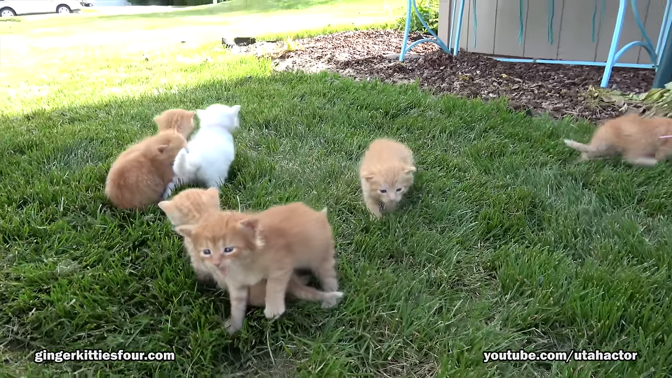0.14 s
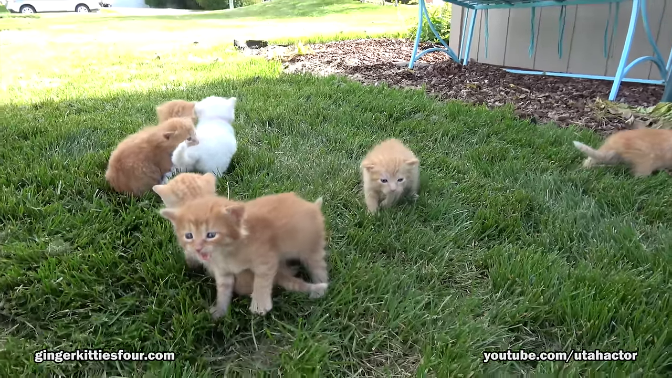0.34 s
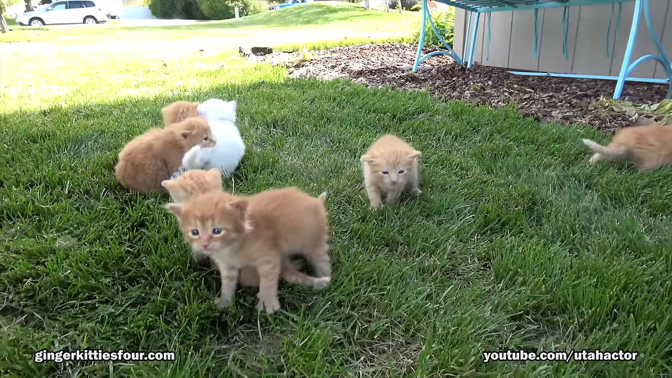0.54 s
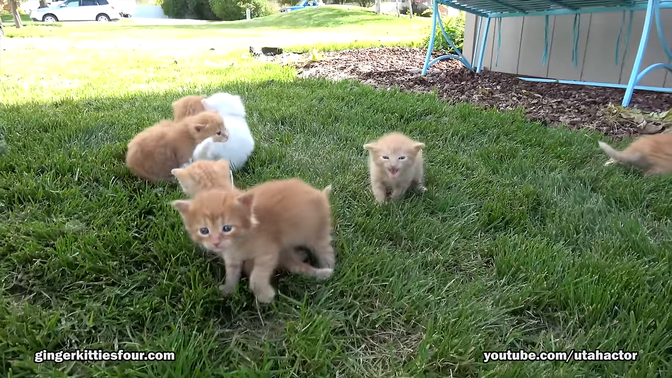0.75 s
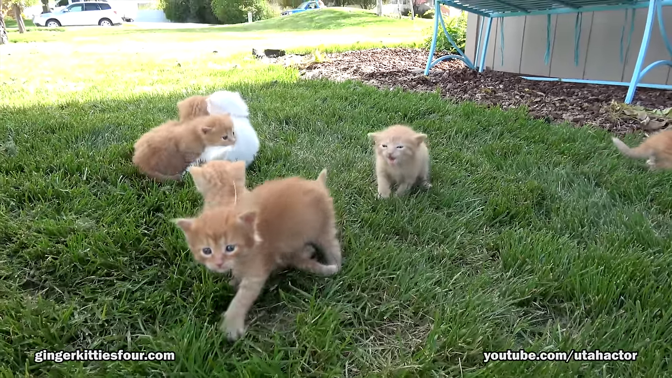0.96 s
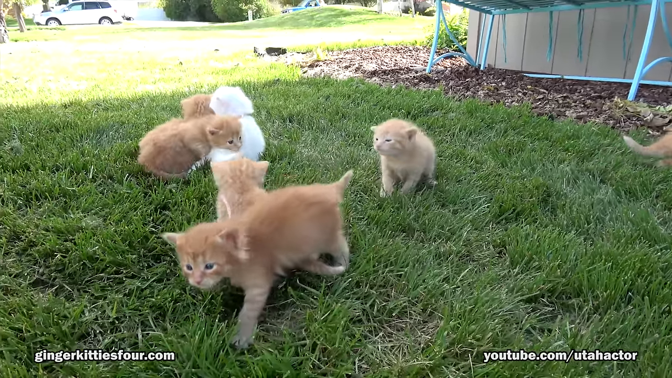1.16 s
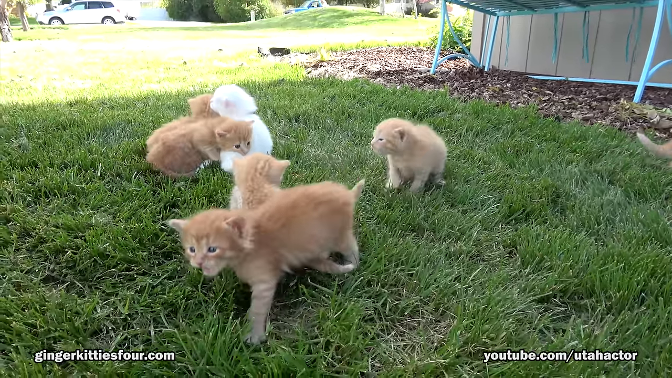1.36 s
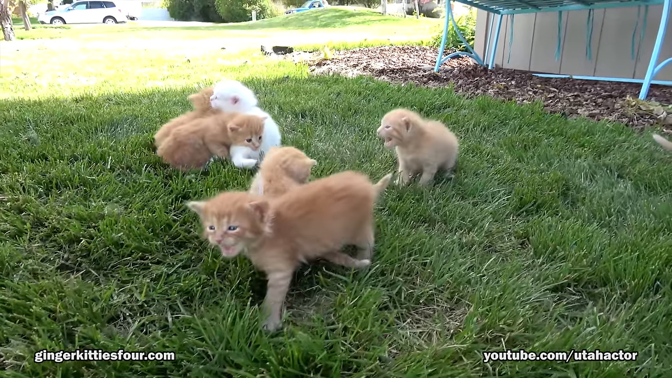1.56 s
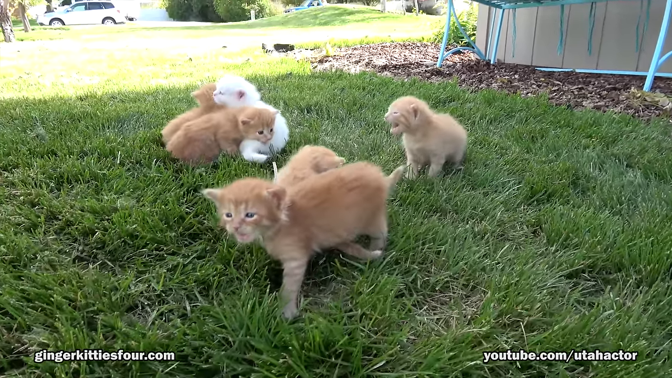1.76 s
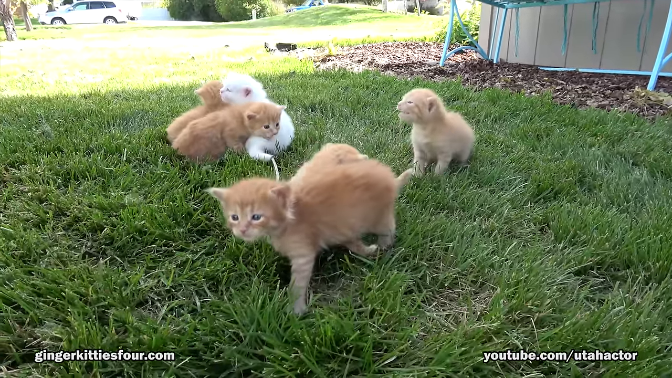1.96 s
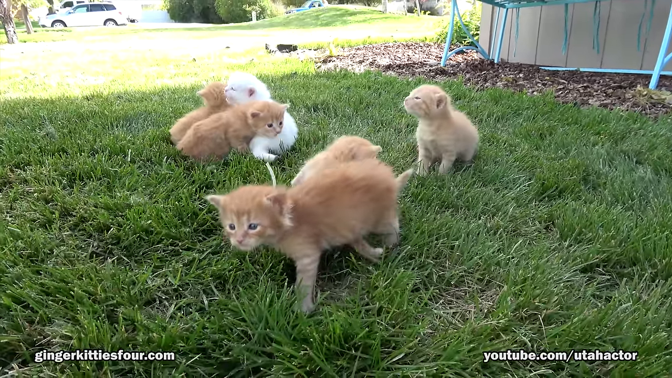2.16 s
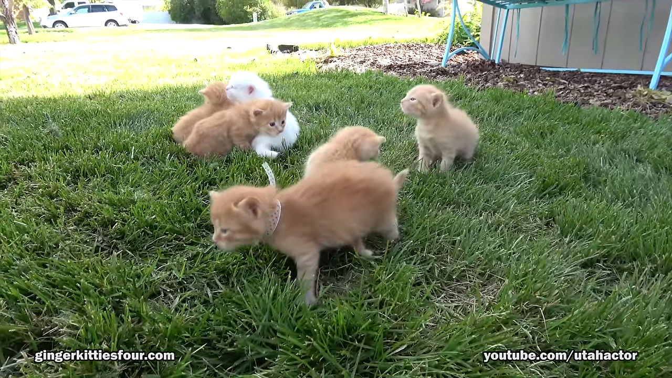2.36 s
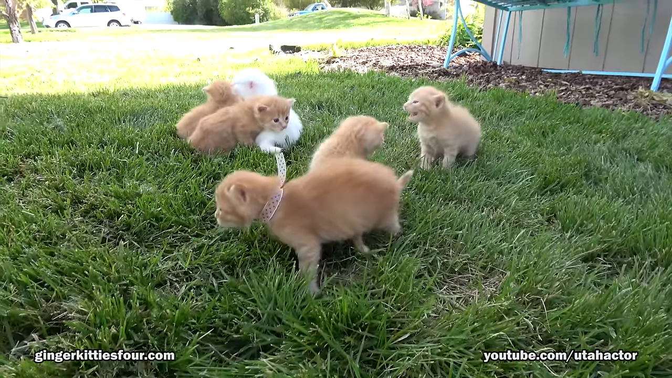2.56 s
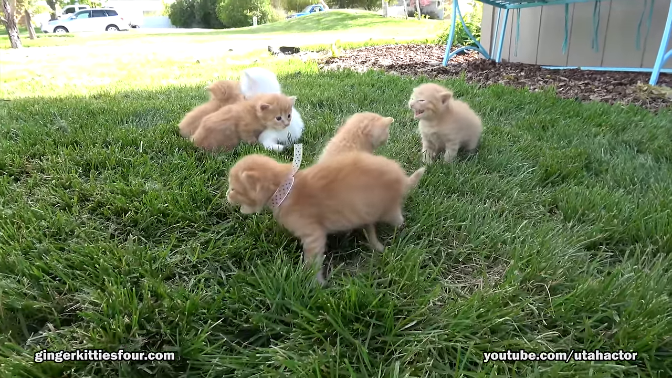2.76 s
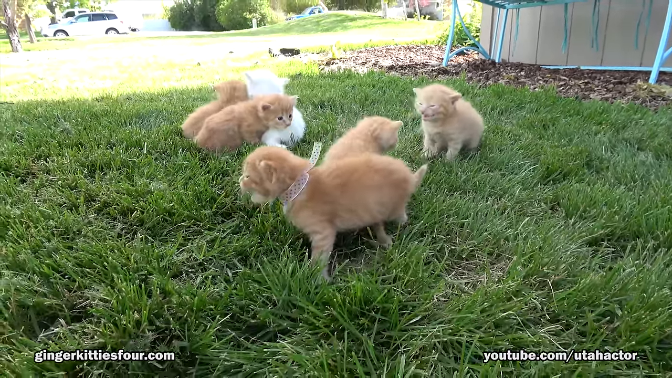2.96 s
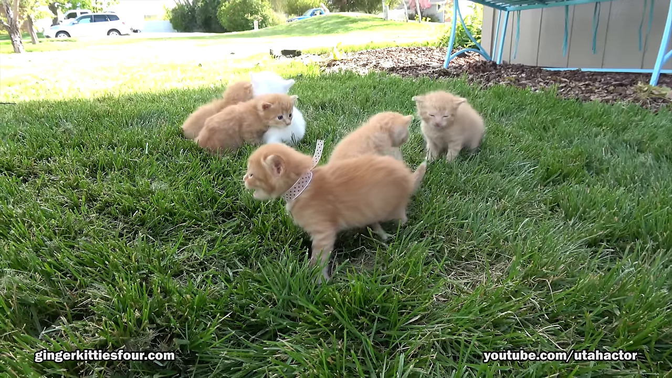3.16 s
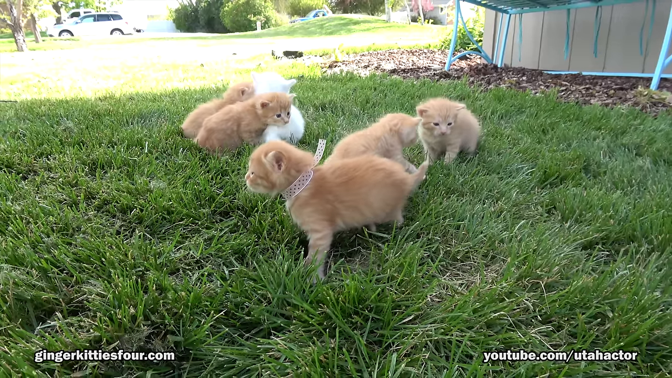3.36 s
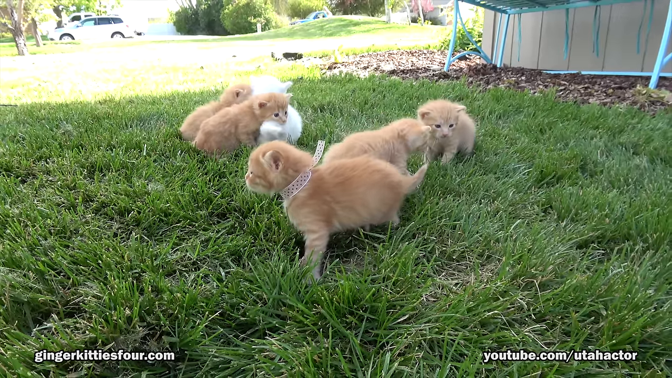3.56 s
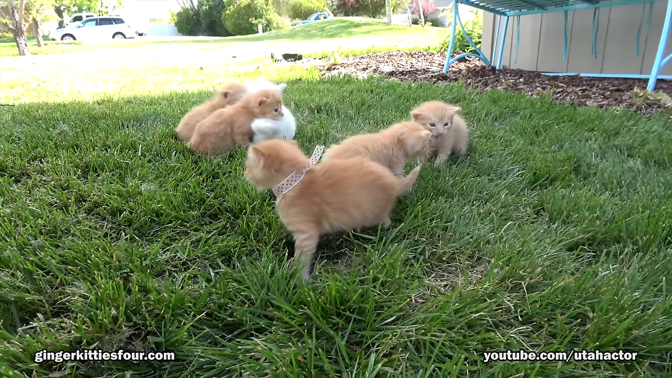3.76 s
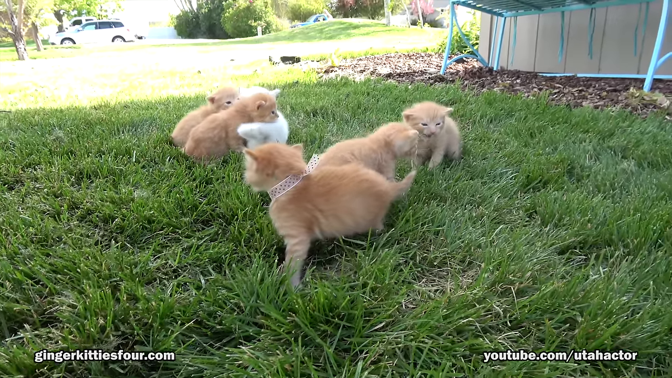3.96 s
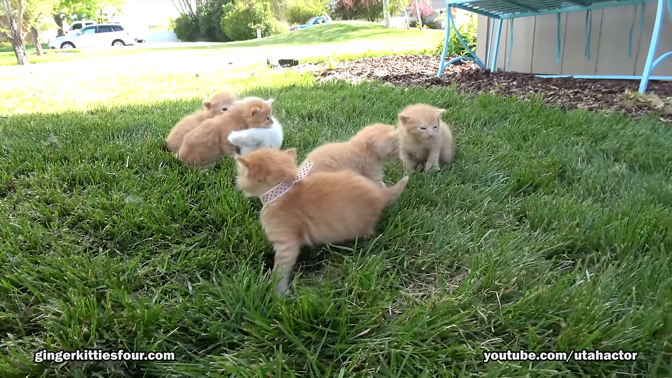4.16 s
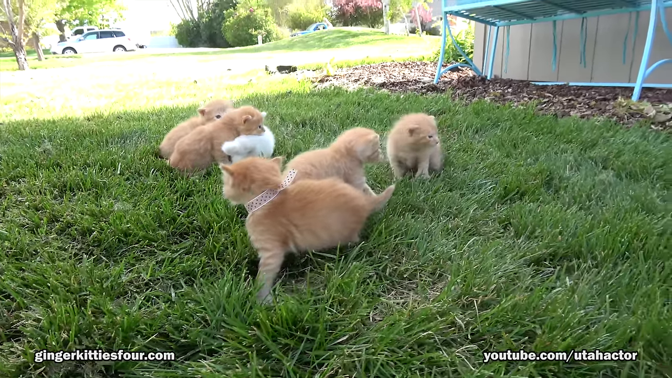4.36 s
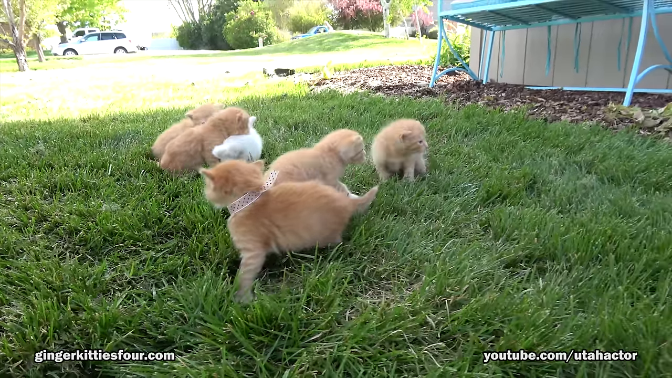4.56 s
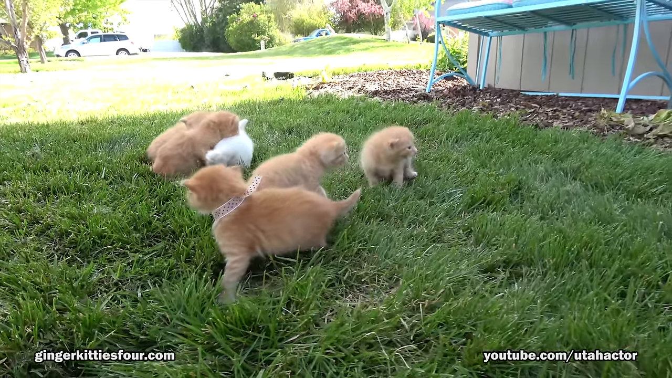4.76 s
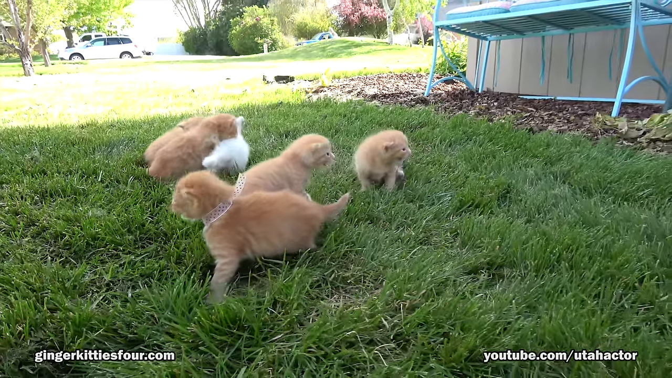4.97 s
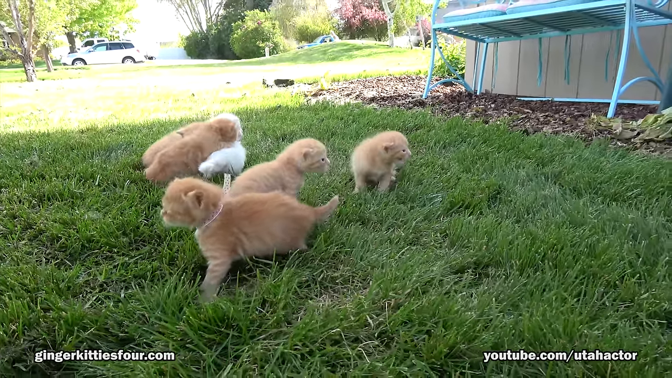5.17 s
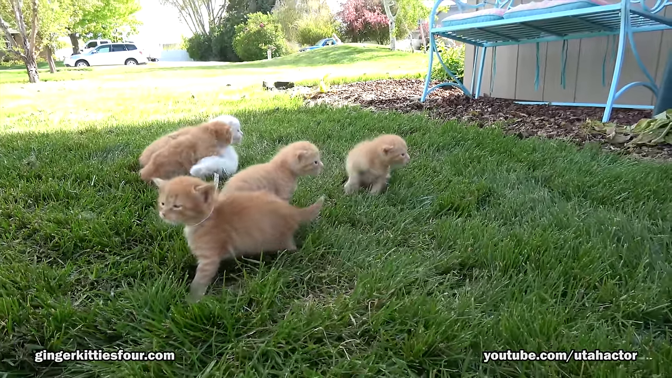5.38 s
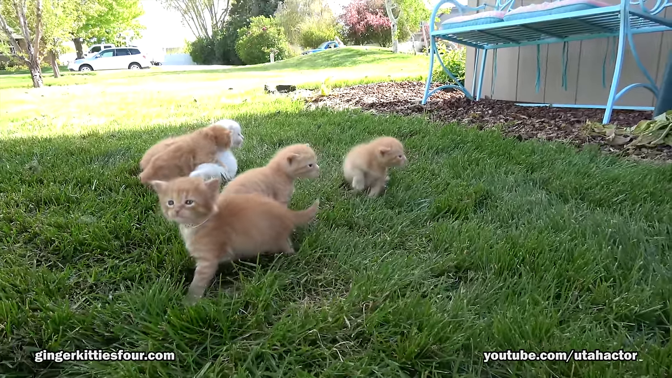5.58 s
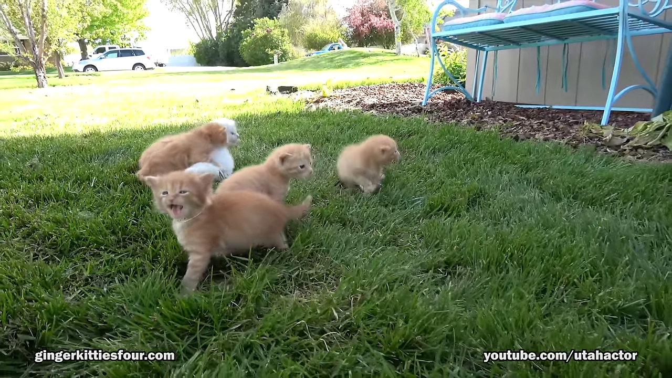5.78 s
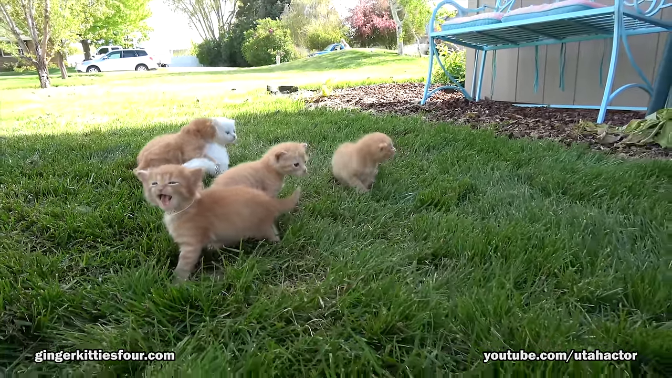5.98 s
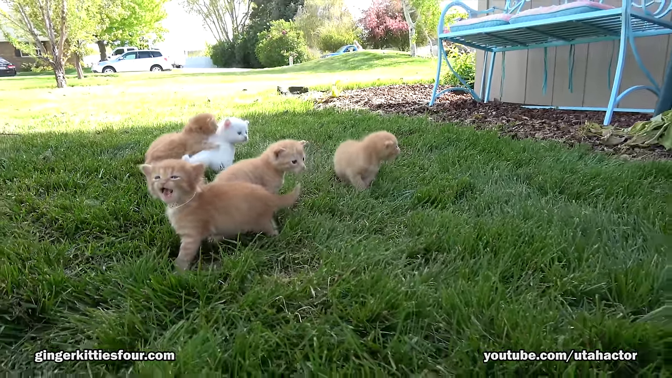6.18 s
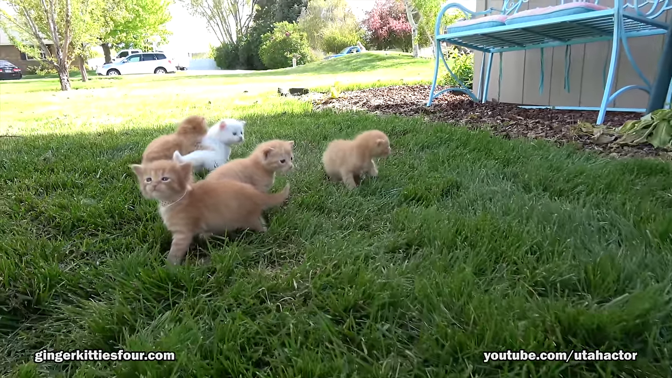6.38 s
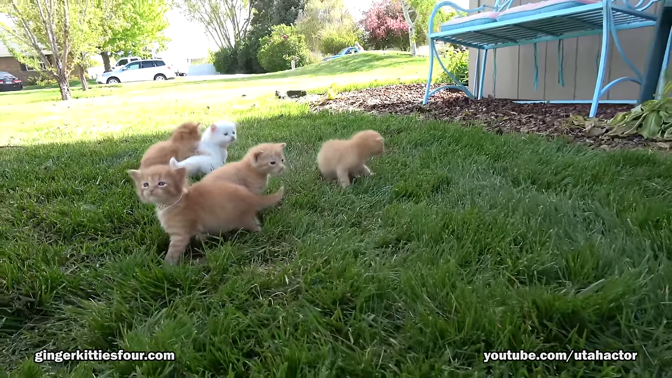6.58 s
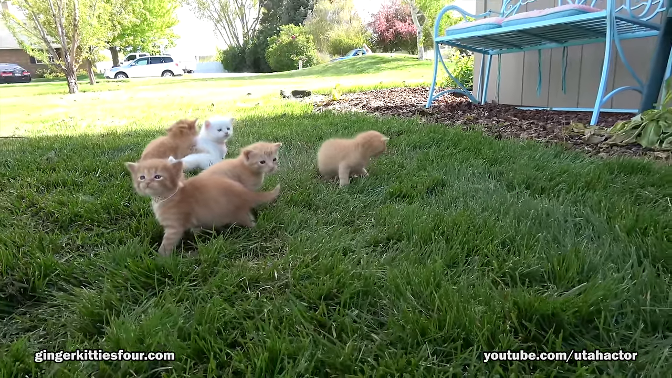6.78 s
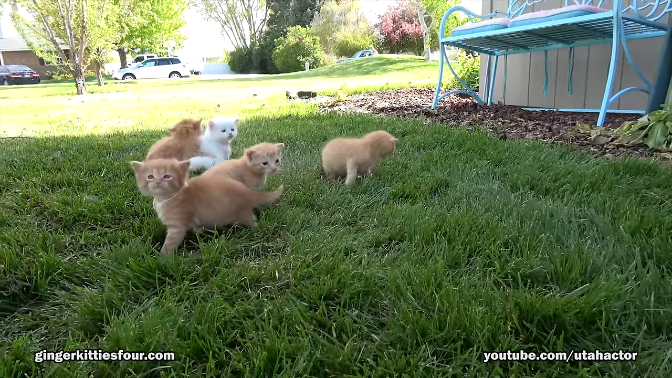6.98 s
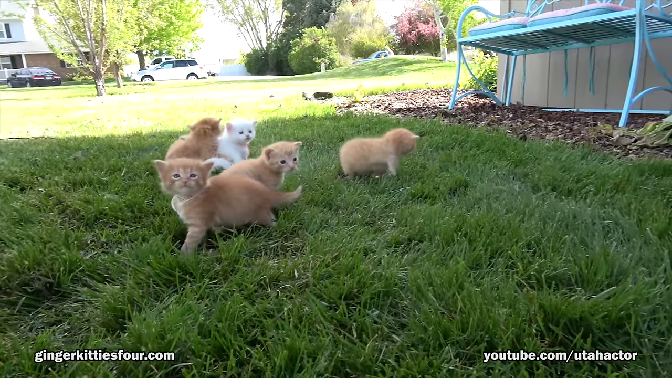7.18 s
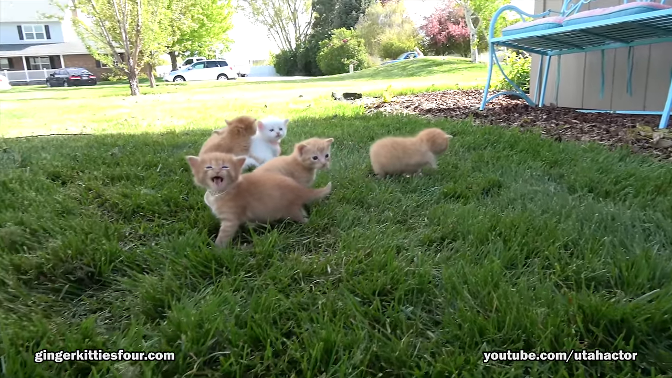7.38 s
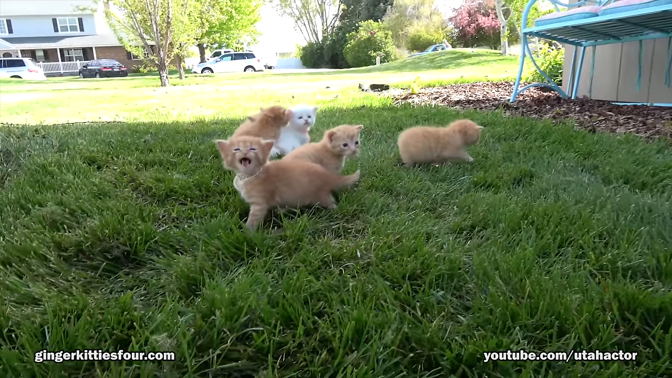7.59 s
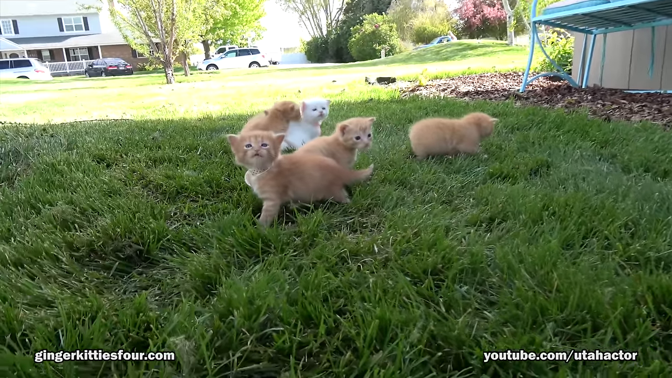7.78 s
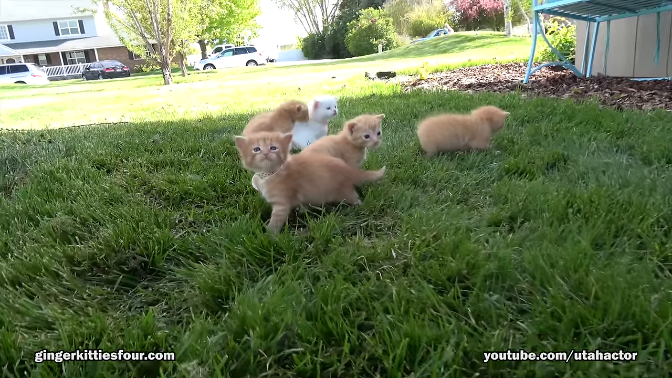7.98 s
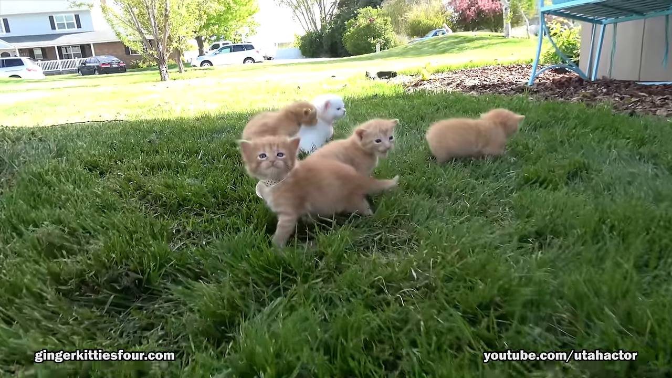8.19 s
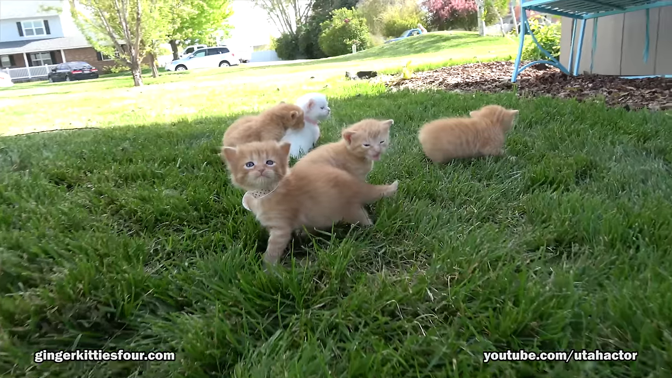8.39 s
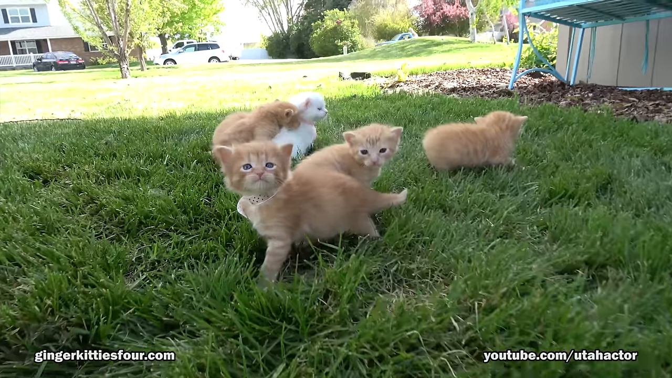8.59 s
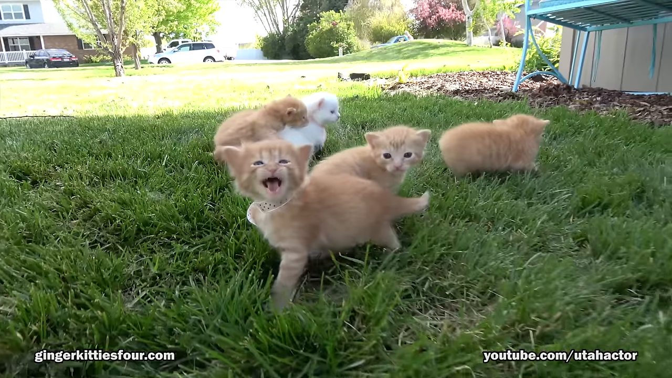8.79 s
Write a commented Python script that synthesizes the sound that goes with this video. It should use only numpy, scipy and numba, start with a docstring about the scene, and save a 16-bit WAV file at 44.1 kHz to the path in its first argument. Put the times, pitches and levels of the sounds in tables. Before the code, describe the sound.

Close by on a lawn, several young kittens mew in short, thin, high calls that rise quickly, hold and fall, often overlapping. Brief gaps separate the clusters. Behind them lie soft road noise, a low engine drone and light wind rumble on the microphone. Grass rustles faintly, and a bird chirps twice in the first half. Open air, mono, almost no echo.

```python
"""Young kittens mew close by on a lawn in overlapping calls: vocal-fold overtones through a moving mouth resonance.
Far traffic is shaped noise in octave bands; wind on the microphone is low noise; an engine drones in noise and tones.
Grass rustles in swells of band-passed noise and ticks with short decaying modes.
A bird chirps twice with gliding sine partials. The camera softens loud peaks and cuts the top."""
import sys
import numpy as np
from scipy import signal
from scipy.fft import rfft, irfft
from scipy.io import wavfile
from scipy.ndimage import uniform_filter1d
from numba import njit

SR = 44100
rng = np.random.default_rng(int(sys.argv[2]) if len(sys.argv) > 2 else 0)


def transcribe(signal):
    """Save signal, clipped to [-1, 1], as a 16-bit WAV file at the path in sys.argv[1]."""
    frames = np.atleast_2d(signal).T
    limited = np.clip(frames, -1, 1)
    pcm = np.round(limited * 32767).astype(np.int16)
    wavfile.write(sys.argv[1], SR, pcm)


N = 389844

# distant traffic, shape of its spectrum: f/Hz, relative level per Hz/dB
TRAFFIC_SPECTRUM = [(88, -12.5), (150, -10), (268, -14), (400, -20.5), (600, -16), (930, -12),
                    (1340, -16.5), (1830, -20), (2650, -27), (2860, -20.5), (4310, -36.5), (15500, -59.5)]
# loudness of the traffic: t/s, level between 250 and 700 Hz/dB
TRAFFIC_LEVEL = [(0, -39), (2.5, -42), (6.3, -44), (7.299, -41.5), (8.84, -43)]
# the low end: t/s, level of wind gusts on the microphone/dB, level of the engine's noise band/dB
WIND_AND_DRONE = [(.25, -33.5, -30.5), (1.1, -43, -34), (1.8, -51, -38.5), (2.251, -29.5, -34.5),
                  (4.4, -42, -35.5), (5.999, -40.5, -42.5), (8.84, -46, -41.5)]
# wavering tones of the engine: f/Hz, amplitude against the drone level/dB
ENGINE_TONES = [(125, -6), (152, -5), (577, -17.5)]
# swells of rustling grass: t of the middle/s, length/s, level at the middle/dB
RUSTLE_SWELLS = [(.08, .14, -36), (2.49, .3, -32), (3.04, .3, -34), (3.31, .24, -32.5), (4.12, .2, -33)]
# short ticks among the blades: t/s, nominal peak level/dB
GRASS_TICKS = [(2.6633, -14), (6.655, -12), (6.6907, -18), (8.4412, -14)]
# ringing modes of a tick, each retuned at random: f/Hz, relative level/dB
BLADE_MODES = [(1650, -3), (2150, 0), (2800, -5), (4700, -15)]
# one pitch and loudness curve a mew: t/s, f of the pitch/Hz, level before the head's colour/dB
MEW_CURVES = [
    [(.082, 944, -40), (.234, 1660, -17.5), (.397, 1596, -15), (.519, 1390, -38)],
    [(.072, 784, -37.5), (.13, 1080, -21), (.197, 1422, -19.5), (.317, 1530, -20), (.422, 1434, -16.5),
     (.506, 1310, -13.5), (.541, 1220, -19), (.589, 890, -30)],
    [(.591, 827, -24), (.626, 1116, -26.5), (.656, 1407, -15.5), (.743, 1605, -13.5), (.798, 1614, -11.5),
     (.88, 1649, -12.5), (.955, 1618, -14), (1.015, 1456, -23.5), (1.052, 855, -34)],
    [(.9, 1790, -41), (.978, 1855, -36), (1.09, 1443, -39), (1.165, 1443, -35), (1.2, 1214, -61)],
    [(1.202, 1044, -32.5), (1.29, 1636, -23.5), (1.457, 1581, -18.5), (1.514, 1498, -29.5),
     (1.594, 1499, -20.5), (1.659, 970, -34)],
    [(1.334, 1590, -36), (1.385, 1370, -26.5), (1.42, 1356, -35), (1.455, 1390, -40)],
    [(1.402, 757, -43), (1.444, 1057, -26.5), (1.512, 1466, -24), (1.621, 1589, -17), (1.791, 1542, -14),
     (1.826, 1509, -9), (1.868, 1650, -20), (1.945, 1194, -27.5), (1.968, 800, -37)],
    [(1.524, 1086, -21), (1.596, 1617, -19), (1.751, 1772, -12.5), (2.023, 1567, -21), (2.073, 1106, -28.5)],
    [(1.783, 1167, -28), (1.861, 1230, -34), (1.9, 1520, -33), (1.96, 1487, -28), (2.0, 1635, -38),
     (2.1, 1915, -21), (2.153, 1630, -24.5), (2.193, 1587, -32.5), (2.232, 1300, -36), (2.242, 1070, -48),
     (2.295, 1080, -50)],
    [(1.7, 1135, -35), (1.76, 1466, -29), (1.795, 1540, -23)],
    [(3.04, 2024, -34), (3.07, 2070, -28.5), (3.105, 1950, -25)],
    [(2.3, 690, -46), (2.35, 1080, -37.5), (2.42, 1475, -29.5), (2.5, 1581, -22.5), (2.65, 1518, -25.5),
     (2.785, 1024, -36)],
    [(2.524, 1380, -32), (2.729, 1200, -42)],
    [(2.554, 898, -48), (2.634, 1550, -20), (2.694, 1752, -20.5), (2.801, 1776, -17.5), (2.991, 1636, -17),
     (3.093, 1444, -28), (3.153, 1014, -37)],
    [(2.761, 814, -28), (2.784, 935, -35.5), (2.876, 1673, -26.5), (2.99, 1640, -25), (3.25, 1467, -16.5),
     (3.285, 1388, -18), (3.307, 1434, -23), (3.385, 1188, -35.5), (3.403, 870, -33), (3.42, 810, -30)],
    [(3.648, 830, -35), (3.68, 1196, -24), (3.761, 1765, -12.5), (3.896, 1819, -8.5), (4.126, 1630, -22.5),
     (4.199, 1340, -32), (4.205, 1010, -27), (4.23, 780, -39)],
    [(3.73, 1090, -30.5), (3.874, 1390, -36.5), (3.996, 1130, -44)],
    [(4.624, 869, -29), (4.662, 1183, -32), (4.714, 1560, -26.5), (4.759, 1633, -25), (4.824, 1595, -12),
     (5.009, 1508, -34), (5.106, 1397, -24.5), (5.24, 794, -42)],
    [(4.77, 888, -31.5), (4.856, 1584, -16.5), (5.006, 1715, -9.5), (5.176, 1634, -15),
     (5.256, 1390, -33.5), (5.28, 990, -34), (5.295, 794, -51)],
    [(4.871, 1106, -36.5), (5.014, 1595, -24), (5.096, 1396, -32), (5.146, 1060, -48)],
    [(5.575, 974, -47.5), (5.612, 1030, -40), (5.65, 1385, -41), (5.673, 1724, -36), (5.686, 1670, -37),
     (5.79, 1766, -35.5), (6.03, 1647, -15.5), (6.071, 1676, -14), (6.181, 1626, -14.5), (6.298, 1494, -43),
     (6.328, 1250, -43)],
    [(5.804, 798, -32), (5.832, 926, -22), (5.893, 1547, -20.5), (5.971, 1697, -15), (6.011, 1677, -10),
     (6.092, 1543, -9.5), (6.13, 1525, -23.5), (6.223, 1487, -21.5), (6.343, 1327, -17.5),
     (6.38, 1308, -24.5), (6.45, 950, -34)],
    [(6.031, 1466, -34), (6.328, 1200, -41)],
    [(6.39, 1550, -63), (6.45, 1782, -34), (6.53, 1794, -37.5), (6.665, 1690, -43)],
    [(6.475, 923, -47), (6.55, 1328, -50), (6.567, 1230, -31.5), (6.59, 1384, -34.5), (6.655, 1424, -31.5),
     (6.75, 1378, -24.5), (6.768, 1460, -24.5), (6.82, 1420, -34.5), (6.88, 1280, -34)],
    [(6.874, 1050, -45), (6.952, 1555, -31), (7.074, 1676, -22.5), (7.234, 1637, -22.5), (7.376, 1402, -36)],
    [(6.962, 1075, -54), (7.109, 1604, -29), (7.268, 1583, -27), (7.338, 1483, -32), (7.398, 1444, -37)],
    [(7.313, 673, -39), (7.351, 1006, -32), (7.381, 1380, -19), (7.438, 1716, -17), (7.488, 1682, -8.5),
     (7.535, 1551, -9), (7.595, 1562, -17), (7.78, 1416, -17.5), (7.797, 1553, -18), (7.857, 1230, -28),
     (7.864, 902, -25.5), (7.89, 764, -46)],
    [(7.922, 961, -54), (7.954, 1150, -22), (7.987, 1490, -32), (8.039, 1653, -28.5), (8.259, 1699, -23),
     (8.371, 1563, -21.5), (8.473, 1383, -35), (8.508, 1230, -24)],
    [(8.122, 1022, -34), (8.189, 1374, -29.5), (8.241, 1541, -21.5), (8.381, 1527, -17.5),
     (8.438, 1458, -23), (8.496, 1372, -19.5), (8.531, 967, -32.5), (8.568, 725, -47)],
    [(8.74, 751, -35.5), (8.815, 1417, -25), (8.87, 1640, -5)],
]
# the mouth opens, holds and closes, one row a mew: opening length/s, holding length/s, closing length/s,
# open resonance f/Hz, closed resonance f/Hz, open tilt/dB per octave, closed tilt/dB per octave,
# tremble depth (scales shake in % of pitch and flutter in dB), treble level from the way the head faces/dB
MOUTH_MOVES = [ (0.16, 0.0074, 0.27, 5620, 630, -5.5, 1, 0.39, -1),
               (0.12, 0.017, 0.19, 4630, 1300, -1.5, 0.5, 0.42, -2),
               (0.16, 0.15, 0.11, 3840, 2270, -5, -4, 0.32, 6.5),
               (0.086, 0.175, .035, 2360, 830, -13, -4, 0.34, -1),
               (0.1, .01, 0.33, 4530, 910, 5, 0, 0.51, -18.5),
               (.01, .01, .09, 4300, 4000, -3, -3, 0.83, -3),
               (.11, 0.0056, 0.24, 5060, 1390, 1.5, -1, 0.6, -4.5),
               (0.089, 0.099, 0.35, 4180, 2040, -5.5, -4.5, 0.36, -3),
               (0.011, 0.06, 0.28, 3330, 2030, 10, -4.5, 1.5, -6),
               (0.039, .03, .01, 3200, 2000, -4, -6, 0.78, -1),
               (.01, 0.041, .01, 1900, 2050, -3, -7, 0.99, -1),
               (0.142, 0.172, 0.073, 3840, 1600, 4.5, -1, 0.39, -14.5),
               (0.0096, .01, .19, 3650, 2600, -8, -2, 0.4, -1),
               (0.2, 0.15, 0.2, 2810, 1790, 0, 0.5, 0.36, -2.5),
               (0.095, 0.0075, 0.36, 4050, 1270, -1.5, -4, 0.34, 4),
               (0.11, 0.18, 0.31, 3680, 2440, -3.5, -6, 0.32, 5),
               (0.0087, 0.061, 0.23, 3500, 2800, 1, -10, .7, -1),
               (0.057, 0.0084, 0.37, 4490, 1240, -2.5, -0.5, 0.33, 0),
               (0.085, 0.28, 0.2, 3430, 2800, -2, -15, 0.27, -6),
               (0.0081, 0.0084, 0.18, 5350, 1800, -2, -3, 0.32, 1),
               (0.043, 0.19, 0.19, 5720, 3310, -10.5, -8, 0.31, 0),
               (0.094, 0.075, 0.3, 4200, 1220, -1.5, 1, 0.32, 2),
               (.01, .01, .23, 2740, 2300, -2, 3, .2, 2.5),
               (.01, 0.085, .09, 3900, 4440, 0.5, -6, 0.22, -13),
               (0.095, 0.11, 0.076, 1920, 1370, 0, 1.5, 0.84, -7),
               (0.012, .2, 0.23, 3510, 3140, -1.5, -2.5, 0.23, -5),
               (0.043, 0.267, 0.16, 3230, 1700, -6, -6, 0.735, -2),
               (0.063, 0.012, 0.38, 4530, 1300, -0.5, -3, 0.406, 0),
               (0.058, 0.2343, 0.26, 4100, 2100, -5, -13, 0.4, -5),
               (0.084, 0.1285, 0.14, 3950, 1260, -2.5, -2, 0.57, -3),
               (0.057, .02, .01, 4800, 4900, -3, -3.5, .2, 7.5), ]
# unchanging colour of a small head: f/Hz, level/dB
HEAD_COLOUR = [(1000, 0), (3500, 2), (8500, -3), (11500, 5), (13500, 0), (15500, -10)]
# a chirp, one curve a partial: t after the start/s, f/Hz, relative level/dB
CHIRP_PARTIALS = [
    [(0, 1900, -16), (.02, 3050, -7), (.032, 3500, 0), (.058, 3520, -1), (.08, 3520, -9), (.16, 3520, -20)],
    [(0, 3300, -22), (.02, 5700, -13), (.035, 6100, -16), (.056, 6200, -20)],
    [(.058, 3500, 2), (.064, 2500, 3), (.078, 1700, -12)],
]
# the two chirps: t of the start/s, level/dB
CHIRP_STARTS = [(0.537, -24.5), (3.502, -26.5)]

MOUTH_START_HZ = 2635  # resonance as a mew begins
MOUTH_DAMP = 0.099  # width of the mouth resonance over its centre
HOARSE_START_S, HOARSENESS = .05, .45  # the folds beat unevenly until the call has settled
PATCHY_DB = 4.5  # spread of the breath noise's level
LATE = int(.035 * SR)  # samples by which the rasp outlasts the tone
CHIRP_SHAKE = .006  # quick tremble of the whistle's pitch, as a share
TOP_HZ = 15600  # upper limit of the camera's sound


def undb(db):
    """Decibels to amplitude."""
    return 10 ** (np.asarray(db) / 20)


def band(x, lo_hz, hi_hz):
    """Band-pass."""
    return signal.sosfilt(signal.butter(2, [lo_hz, hi_hz], "band", fs=SR, output="sos"), x)


def unit(x):
    """Scale to an RMS of one."""
    return x / np.sqrt(np.mean(x ** 2))


def noise_band(size, lo_hz, hi_hz):
    """Band-passed white noise at an RMS of one."""
    return unit(band(rng.standard_normal(size), lo_hz, hi_hz))


def walk(rate, size=N):
    """Random levels held 1 / rate s and slewed twice; spread near 1."""
    hold = int(SR / rate)
    steps = np.repeat(rng.standard_normal(size // hold + 1), hold)
    return 1.634 * uniform_filter1d(uniform_filter1d(steps, hold), hold)[:size]


def sweep(hz):
    """Phase of a tone with a moving frequency."""
    return 2 * np.pi * np.cumsum(hz) / SR


def colour(hz, table):
    """Level in dB read from an f/Hz, level/dB table along log frequency."""
    f, db = np.transpose(table)
    return np.interp(np.log(hz), np.log(f), db)


def glide(t, s, hz):
    """Smooth cubic curve through the points, with harmonic-mean slopes that restrain overshoot."""
    h, d = np.diff(s), np.diff(hz) / np.diff(s)
    a, b = 2 * h[1:] + h[:-1], h[1:] + 2 * h[:-1]
    mean = (a + b) * d[1:] * d[:-1] / (a * d[1:] + b * d[:-1] + 1e-9)
    inner = np.where(d[1:] * d[:-1] > 0, mean, 0)  # flat at peaks and dips
    m = np.r_[d[0], inner, d[-1]]
    if len(inner):
        m[[0, -1]] = (3 * d[[0, -1]] - inner[[0, -1]]) / 2
    i = np.clip(np.searchsorted(s, t) - 1, 0, len(h) - 1)
    u = (t - s[i]) / h[i]
    cubic = m[i] + m[i + 1] - 2 * d[i]
    square = 3 * d[i] - 2 * m[i] - m[i + 1]
    return hz[i] + h[i] * u * (m[i] + u * (square + u * cubic))


def play(rows, fade_s):
    """First sample, gliding pitch, level in dB, and a fade in with a somewhat shorter fade out."""
    s, hz, db = np.transpose(rows)
    at = int(s[0] * SR)
    t = np.arange(at, int(s[-1] * SR)) / SR
    fade = np.clip(np.minimum(t - s[0], (s[-1] - t) / 0.68) / fade_s, 0, 1)
    return at, glide(t, s, hz), np.interp(t, s, db), fade


def add(out, at, x):
    """Mix x in from sample at, cut off at the end of the scene."""
    out[at:at + len(x)] += x[:max(N - at, 0)]


def traffic():
    """Overlapping octave bands of far-off road noise that swell together and flicker alone."""
    f = np.maximum(np.fft.rfftfreq(N, 1 / SR), 1)
    spectrum = rfft(rng.standard_normal(N)) * undb(colour(f, TRAFFIC_SPECTRUM))
    out, swell = np.zeros(N), walk(0.12)
    for hz in 30 * 2. ** np.arange(10):
        share = np.cos(np.pi / 2 * np.clip(np.log2(f / hz), -1, 1)) ** 2
        out += irfft(spectrum * share, N) * undb(0.4 * swell + 0.8 * walk(3.95))
    s, db = np.transpose(TRAFFIC_LEVEL)
    return out / np.std(band(out, 250, 700)) * undb(np.interp(np.arange(N) / SR, s, db))


def wind():
    """Light wind buffets the membrane: low noise with an unsteady level."""
    s, gust_db, _ = np.transpose(WIND_AND_DRONE)
    level_db = np.interp(np.arange(N) / SR, s, gust_db) + 0.72 * walk(8.2)
    return noise_band(N, 36, 66.3) * undb(level_db)


def engine():
    """A far engine drones just above the wind: a noise band and tones that waver in pitch and level."""
    s, _, drone_db = np.transpose(WIND_AND_DRONE)
    out = noise_band(N, 85.0, 152.0) * undb(1.4 * walk(1.8))
    for hz, db in ENGINE_TONES:
        level = undb(db + 2.25 * walk(2.42))
        out += level * np.sin(sweep(hz * (1 + 0.00783 * walk(1.7))))
    return out * undb(np.interp(np.arange(N) / SR, s, drone_db))


def rustle():
    """Dense grains of uneven size, heard in swells as the grass rustles."""
    t = np.arange(N) / SR
    grains = rng.standard_normal(N) * undb(2.5 * walk(120))
    swell = sum(undb(db) * np.exp(-(2 * (t - mid) / length) ** 4) for mid, length, db in RUSTLE_SWELLS)
    return swell * unit(band(grains, 810, 1660))


def ticks():
    """Single ticks among the blades: a few modes that ring for some ms, tuned afresh each time."""
    out = np.zeros(N)
    t = np.arange(int(.03 * SR)) / SR
    for s, db in GRASS_TICKS:
        ring = np.zeros(len(t))
        for hz, mode_db in BLADE_MODES:
            detune, phase = rng.standard_normal(2)
            ring += undb(mode_db - 5) * np.sin(2 * np.pi * hz * (1 + .05 * detune) * t + phase)
        decay = undb(db - 60 * t / 0.022)
        add(out, int(s * SR), ring * decay * np.clip(t / 0.005, 0, 1))
    return out


def overtone_gains(t, k, hz, mouth):
    """Gain of each overtone k: spectral tilt, moving mouth resonance, then the colour of the head."""
    *lengths, open_hz, closed_hz, open_db, closed_db, tremble, treble_db = mouth
    moments = np.cumsum(np.abs([0, *lengths]))
    mouth_hz = np.interp(t, moments, [MOUTH_START_HZ, open_hz, open_hz, closed_hz])
    tilt_db = np.interp(t, moments[2:], [open_db, closed_db])
    tilt_db = tilt_db - 5 * np.exp(-t / .035)  # a call begins dull
    u = k * hz / mouth_hz
    resonance = 1 / np.hypot(1 - u ** 2, MOUTH_DAMP * u)
    gain = undb(tilt_db * np.log2(k)) * (resonance + 0.019)  # some treble passes a shut mouth
    gain *= undb(-1.1 * np.exp(-t / .04) * np.maximum(k - 4, 0))  # the top overtones come in late
    gain /= np.sqrt(np.sum(gain[:9] ** 2, axis=0))
    gain *= undb(colour(k * hz, HEAD_COLOUR)) * (k * hz < .4 * SR)
    gain *= undb(treble_db * np.clip(np.log2(k * hz / 5500), 0, 1))
    # every overtone wavers by itself as the head turns, the high ones most
    size = len(hz)
    waver_db = [n * (.3 * walk(25, size) + .35 * walk(7, size)) for n in np.minimum(k, 9)]
    # a trembling voice also flutters in level
    return gain * undb(waver_db + tremble * walk(200, size))


def breath(t, db, fade, edges, start, treble_db):
    """Air noise: a steady hiss, a breathy opening, and a patchy rasp past the slack folds."""
    size = len(t)
    hiss = noise_band(size, 9000, 14500) * undb(db - 50 + treble_db + 12 * edges)
    puff = noise_band(size, 4500, 8000) * undb(db - 21 + PATCHY_DB * walk(60, size))
    puff *= start * t / HOARSE_START_S
    # the rasp outlasts the tone a little
    leak = np.r_[edges * np.maximum.accumulate(fade), np.hanning(2 * LATE)[LATE:]]
    size = len(leak)
    rasp = sum(noise_band(size, f, 1.48 * f) * undb(PATCHY_DB * walk(50.4, size)) for f in (2500, 4500, 9000))
    rasp *= leak * undb(np.median(db) - 40.5)
    return np.pad((hiss + puff) * fade, (0, LATE)) + rasp


def mew(rows, mouth):
    """Overtones of the vocal folds through one moving mouth resonance, with air noise."""
    at, hz, db, fade = play(rows, fade_s=.017)
    size = len(hz)
    t = np.arange(size) / SR
    tremble, treble_db = mouth[-2:]
    edges = np.exp(-t / 0.0264) + np.exp((t - t[-1]) / 0.042)  # folds are slack as the call starts and ends
    shake = .5 * tremble * walk(60, size) + (.7 * tremble + 2.2 * edges) * walk(200, size)
    hz = hz * (1 + shake / 100)
    k = np.arange(1, 17)[:, None]
    gain = overtone_gains(t, k, hz, mouth)
    tone = np.sqrt(2) * np.sum(gain * np.cos(k * sweep(hz)), axis=0)
    # uneven beating roughens the start and the end
    start = np.exp(-(t / HOARSE_START_S) ** 2)
    hoarse = HOARSENESS * np.maximum(start, edges.clip(0, 1))
    tone *= np.sqrt(1 - hoarse ** 2) + hoarse * walk(900, size)
    voice = np.pad(tone * undb(db) * fade, (0, LATE))
    return at, voice + breath(t, db, fade, edges, start, treble_db)


def kittens():
    """All mews, with a faint decaying scatter from the ground, the wall and the trees."""
    out = np.zeros(N)
    for rows, mouth in zip(MEW_CURVES, MOUTH_MOVES):
        add(out, *mew(rows, mouth))
    t = np.arange(int(.3 * SR)) / SR
    scatter = rng.standard_normal(len(t)) * undb(-60 * t / 0.28) * (t > .004)
    scatter /= np.linalg.norm(scatter)
    return out + undb(-23) * signal.fftconvolve(out, scatter)[:N]


def bird():
    """Two alike chirps of thin whistled partials, each a gliding sine with a quick tremble."""
    out = np.zeros(N)
    for start, level_db in CHIRP_STARTS:
        for rows in CHIRP_PARTIALS:
            at, hz, db, fade = play(rows, fade_s=0.00083)
            whistle = np.sin(sweep(hz * (1 + CHIRP_SHAKE * walk(600, len(hz)))))
            level = undb(db + level_db + 2 * walk(120, len(hz)))
            add(out, at + int(start * SR), whistle * level * fade)
    return out


def scene():
    """The lawn in one channel: traffic, wind, engine, grass, kittens and bird."""
    return (traffic() + wind() + engine() + rustle() + ticks() + kittens() + bird())[None]


@njit
def follow(x, attack, release):
    """Envelope that rises fast and falls slowly."""
    e, out = 0., np.empty(len(x))
    for i in range(len(x)):
        e += (abs(x[i]) - e) * (attack if abs(x[i]) > e else release)
        out[i] = e
    return out


def record(dry):
    """The camera turns its gain down under the loudest sounds and cuts the top."""
    loud = follow(dry[0], 1 / (.0015 * SR), 1 / (.06 * SR))  # 1.5 ms attack, 60 ms release
    gain = np.minimum(1, undb(-7) / (loud + 1e-9)) ** .7
    return signal.sosfilt(signal.ellip(10, .2, 70, TOP_HZ, fs=SR, output="sos"), dry * gain)


dry = scene()
out = record(dry)
transcribe(out)
```